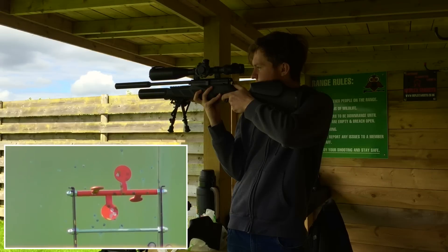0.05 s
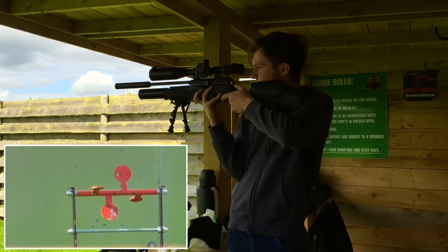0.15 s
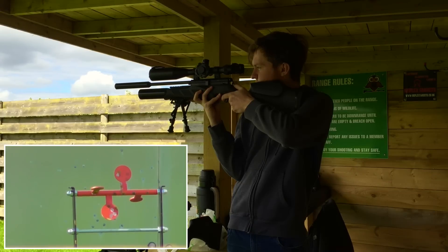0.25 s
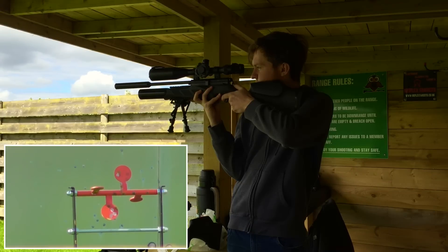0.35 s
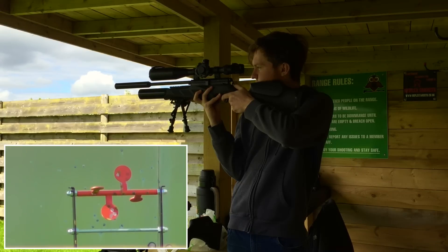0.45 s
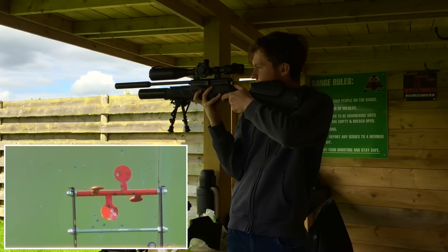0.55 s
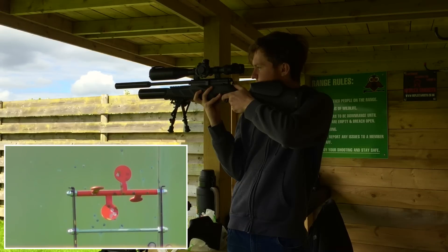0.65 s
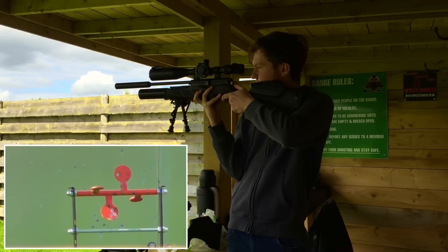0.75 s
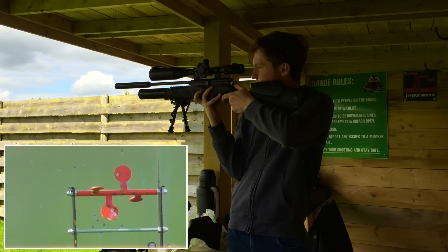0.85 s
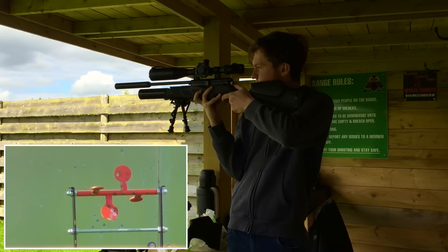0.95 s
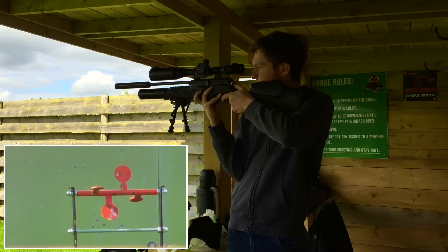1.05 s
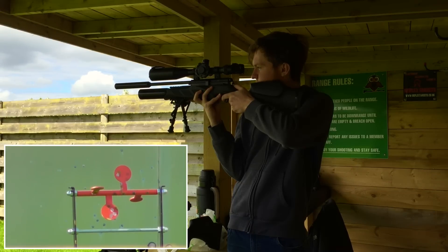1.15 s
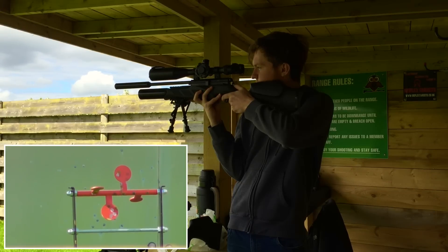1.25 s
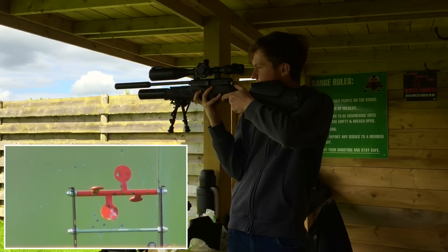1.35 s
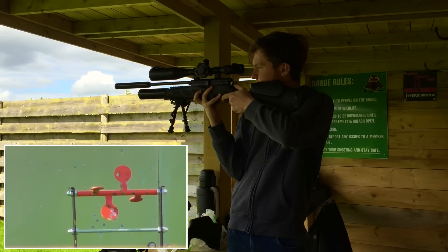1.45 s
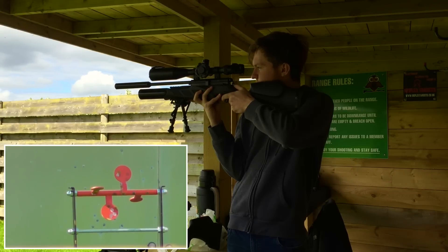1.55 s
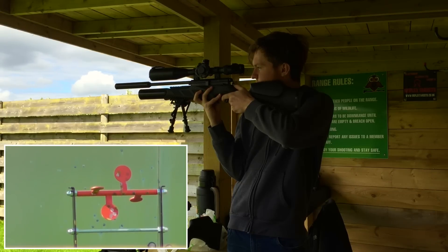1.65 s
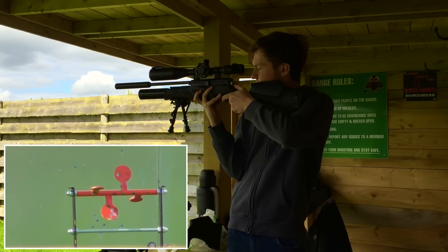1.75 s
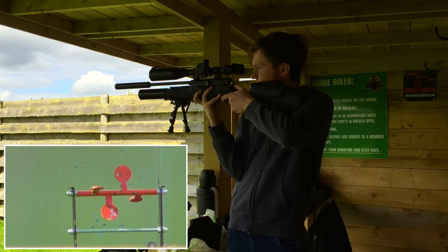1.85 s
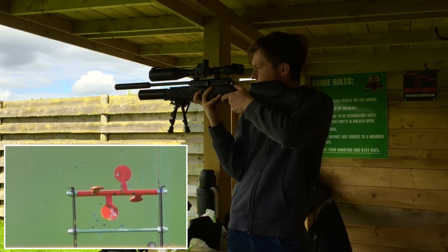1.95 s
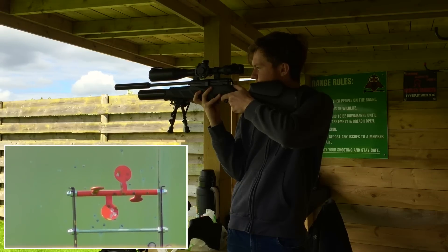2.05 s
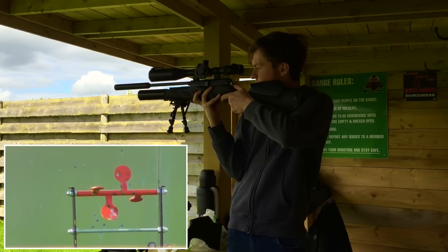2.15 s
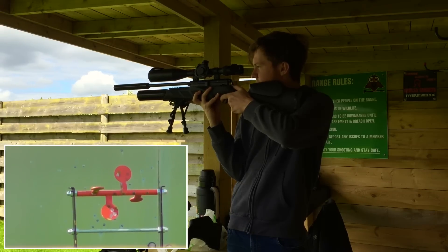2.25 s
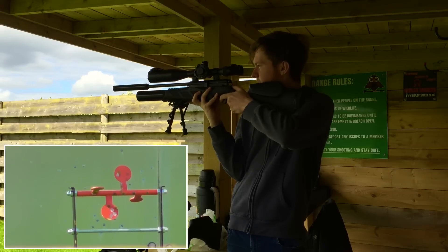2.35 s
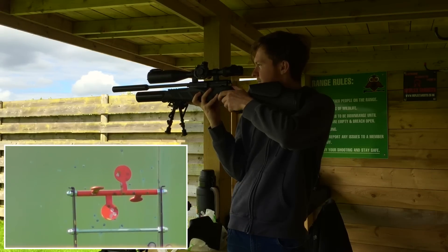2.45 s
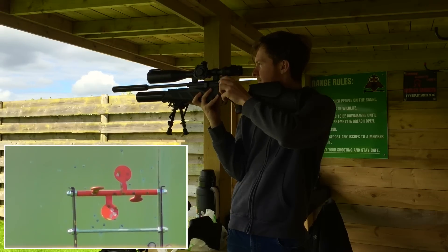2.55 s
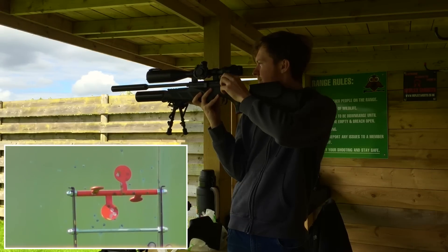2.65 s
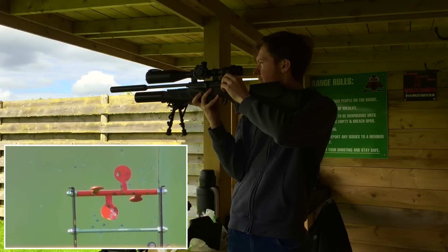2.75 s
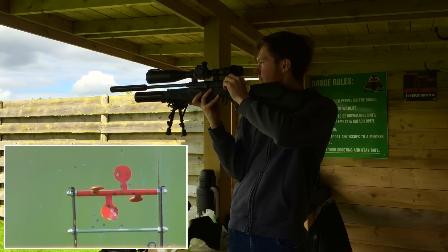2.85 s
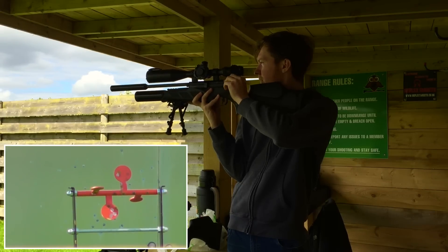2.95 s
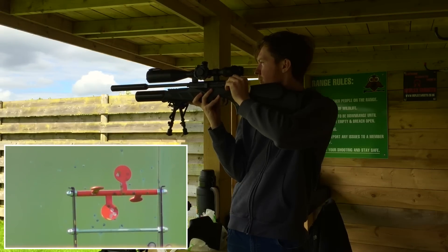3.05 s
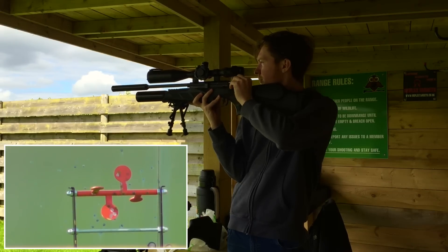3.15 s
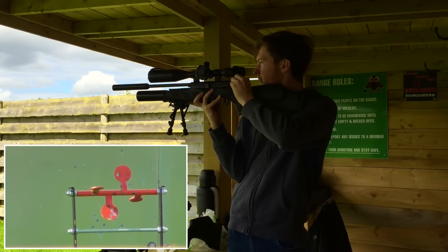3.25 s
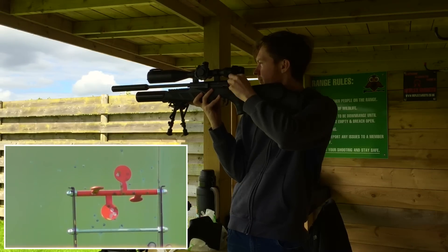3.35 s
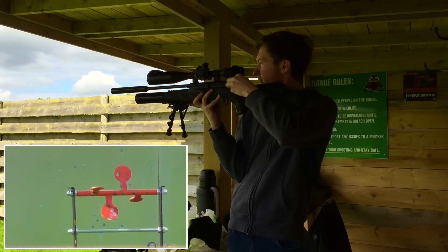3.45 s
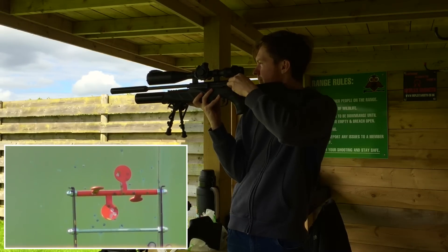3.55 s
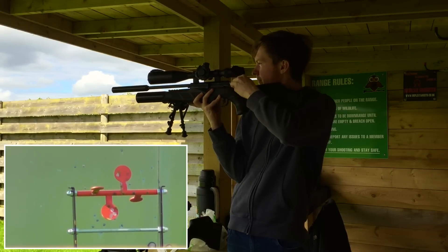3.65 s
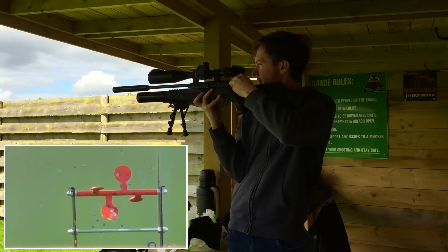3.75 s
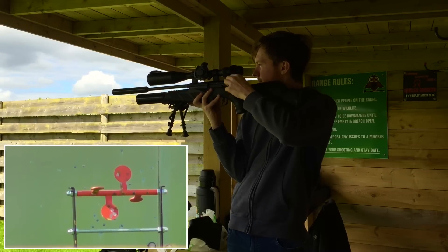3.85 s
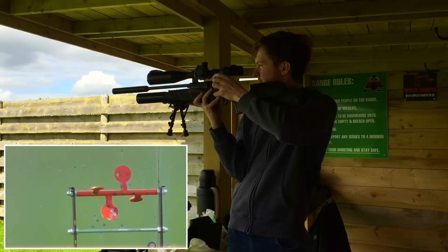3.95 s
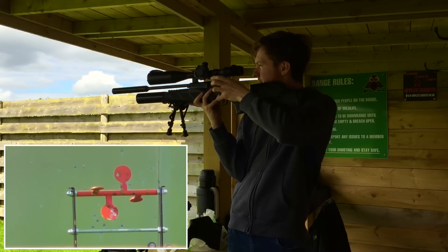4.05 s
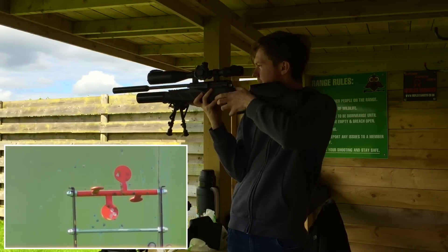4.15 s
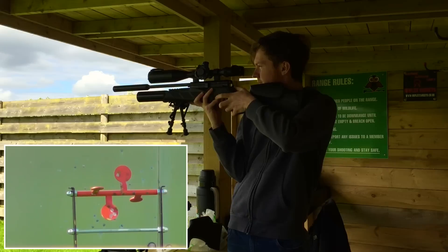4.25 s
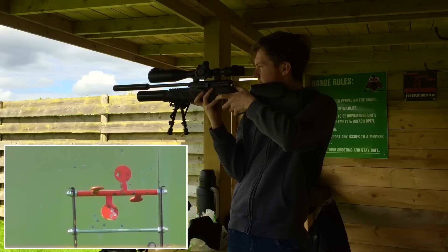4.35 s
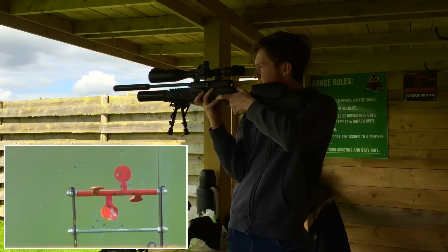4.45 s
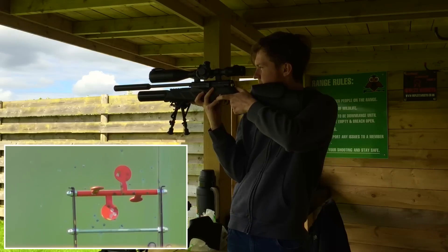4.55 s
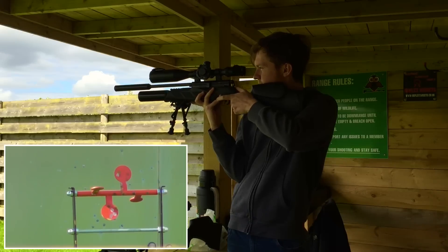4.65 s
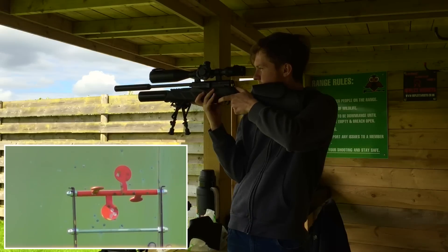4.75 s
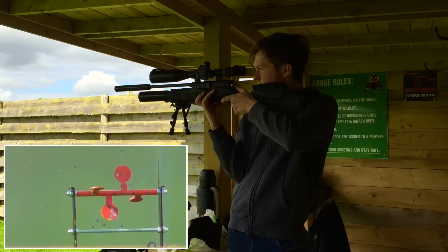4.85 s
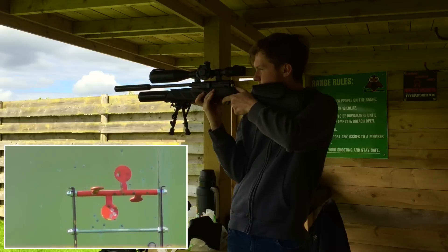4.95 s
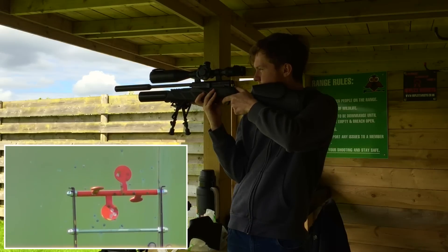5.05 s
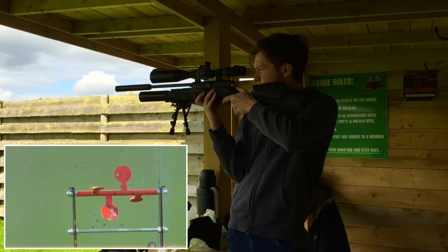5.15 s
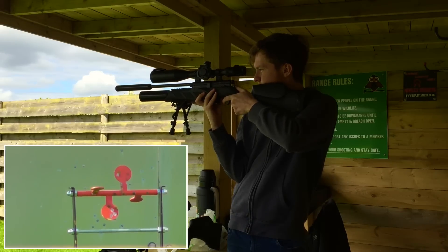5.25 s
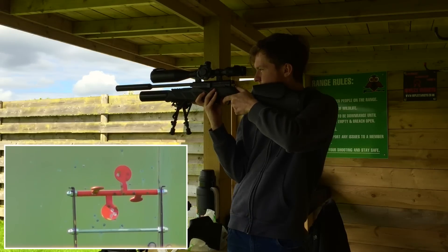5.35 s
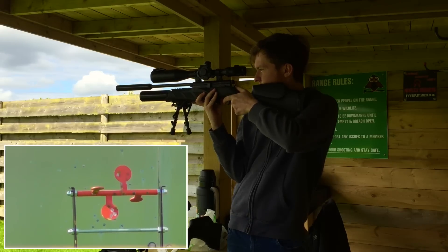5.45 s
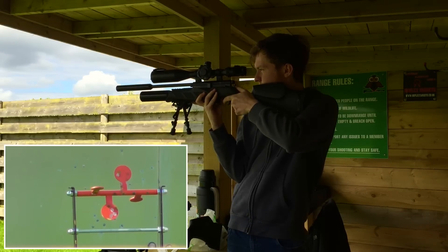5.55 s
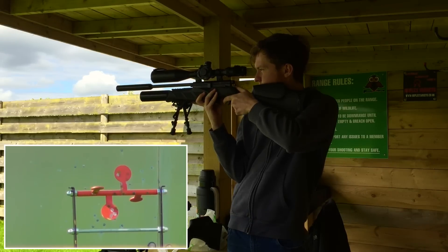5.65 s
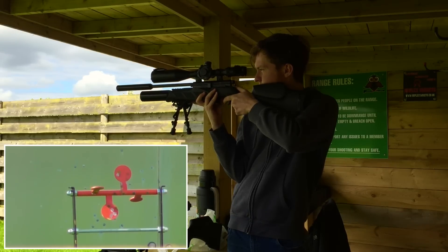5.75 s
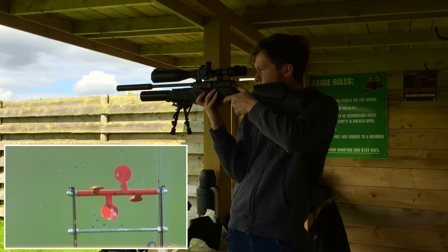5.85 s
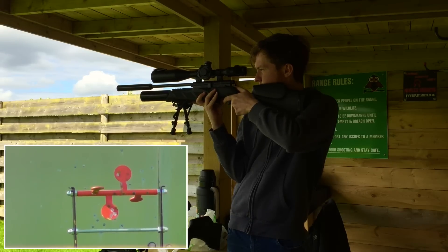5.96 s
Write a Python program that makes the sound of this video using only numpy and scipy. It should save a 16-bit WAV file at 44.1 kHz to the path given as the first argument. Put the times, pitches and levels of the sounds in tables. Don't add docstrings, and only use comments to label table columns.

```python
import sys
import numpy as np
from scipy import signal
from scipy.fft import rfft, irfft
from scipy.io import wavfile
from scipy.ndimage import uniform_filter1d

SR = 44100
rng = np.random.default_rng(int(sys.argv[2]) if len(sys.argv) > 2 else 0)


def digitize_waveform(pressure):
    field = np.atleast_2d(pressure).T
    bounded = np.clip(field, -1, 1)
    quanta = np.round(bounded * 32767).astype(np.int16)
    wavfile.write(sys.argv[1], SR, quanta)


def volts(x):
    e = np.asarray(x, float) / 20
    return 10 ** e


N = 265305

# (time [s], ring level [dB], crack level [dB])
STRIKES = [
    (2.0545, -22.5, -14),
    (2.1038, -67, -23),
    (2.463, -67, -56),
]
# (frequency [Hz], level [dB], t60 [s])
STOCK_MODES = [(320, -22.5, 0.035), (593, -0.5, 0.01), (716, 2.5, 0.057), (1020, -44, 0.024),
               (1269, 11, 0.032), (1466, 21.5, 0.0085), (1977, 4.5, 0.04)]
# (frequency [Hz], level [dB], t60 [s])
BREECH_MODES = [(2270, 1, 0.009), (2314, 2, 0.01), (3005, 8, 0.0086), (3023, 4, 0.014), (3850, 3.5, 0.0065),
                (4430, 2.5, 0.0048)]
# (frequency [Hz], level [dB], t60 [s])
BOLT_MODES = [(5290, 3, 0.005), (5560, 1, 0.035), (5720, 17, 0.009), (6255, 14, 0.003), (7390, 7, 0.0047),
              (8320, 10, .005)]


def rms_one(x):
    return x / np.sqrt(np.mean(x ** 2) + 1e-20)


def along(rows):
    s, db = np.transpose(rows)
    return volts(np.interp(np.arange(N) / SR, s, db, left=-200, right=-200))


def swelling(start, rise, hold, fall, level_db):
    corners = np.cumsum([start, rise, hold, fall])
    return along(np.transpose([corners, level_db - np.array([30, 0, 0, 30])]))


def bumps(rows, width_s):
    t = np.arange(0, N, 40) / SR
    swings = sum(db * np.exp(-((t - s) / width_s) ** 2) for s, db in rows)
    return np.interp(np.arange(N) / SR, t, swings)


def at_hz(points, hz):
    table = np.array(points)
    return np.interp(np.log(hz), np.log(table[:, 0]), table[:, 1])


def coloured(x, spectrum):
    gain = volts(np.maximum(at_hz(spectrum, np.linspace(1, SR / 2, 4097)), -90))
    cepstrum = irfft(np.log(gain))
    cepstrum[1:4096] *= 2
    cepstrum[4097:] = 0
    response = irfft(np.exp(rfft(cepstrum)))
    response = response / np.sqrt(np.sum(response ** 2))
    return signal.fftconvolve(x, response)[:len(x)]


def drift(rate_hz):
    r = np.exp(-80 * np.pi * rate_hz / SR)
    noise = rng.standard_normal(N // 40 + 2002)
    slow = signal.lfilter([1], [1, -2 * r, r * r], noise)[2000:]
    return np.interp(np.arange(N) / 40, np.arange(len(slow)), rms_one(slow))


def ring(x, hz, t60):
    r, w = volts(-60 / (t60 * SR)), 2 * np.pi * hz / SR
    return signal.lfilter([0, np.sin(w)], [1, -2 * r * np.cos(w), r * r], x + 1e-18)


def filtered(x, order, hz, kind):
    return signal.sosfilt(signal.butter(order, hz, kind, fs=SR, output="sos"), x)


def dying(decays, rise_s):
    t = np.arange(SR) / SR
    edges = 40 * 2 ** np.arange(0, 9, 1 / 3)
    white = rng.standard_normal((2, SR))
    out = 0
    for k, (low, high) in enumerate(zip(edges, edges[1:])):
        band = filtered(white[k % 2], 2, [low, high], "band")
        t60 = at_hz(decays, np.sqrt(low * high))
        out = out + band * volts(-60 * t / t60)
    return out * np.minimum(t / rise_s, 1)


def add(out, s, x):
    i = round(s * SR)
    out[i:i + len(x)] += x[:N - i]


def rifle_shot():
    # (time [s], peak level [dB], air level [dB], air t60 [s])
    pulses = [
        (1.749, -78.5, -64, 0.081),
        (1.7642, -69, -51, 0.053),
        (1.7697, -17, -19, 0.04),
        (1.773, -11.5, -13, 0.035),
        (1.7831, -17, -22, 0.056),
        (1.792, -21, -25, .055),
    ]
    # (frequency [Hz], level [dB per Hz])
    blast_tone = [(40, -13.5), (90, -2.5), (180, 1.5), (270, 0.5), (370, -11), (520, -16), (640, -3.5),
                  (850, -11.5), (1500, -5.5), (3000, -8.5), (4200, -9.5), (6200, -7.5), (8500, -10.5),
                  (16000, -15)]
    out, t = np.zeros(N), np.arange(SR // 5) / SR
    for s, peak_db, air_db, t60 in pulses:
        n_wave = (t / 0.00011 - 1) * (t < .00024)
        air = rng.standard_normal(len(t)) * volts(-60 * t / t60)
        add(out, s, volts(peak_db + 2) * n_wave + volts(air_db) * air)
    return coloured(out, blast_tone)


def field_echo():
    # (start [s], rise [s], hold [s], fall [s], level [dB])
    echoes = [
        (1.79, .07, .005, .1, -44.5),
        (1.85, .12, .07, .4, -56),
    ]
    # (frequency [Hz], level [dB per Hz])
    echo_tone = [(290, -47), (500, -24), (578, -4), (678, -11.5), (750, -11), (1980, 0.5), (3250, -8),
                 (3980, -5), (16000, -21.5)]
    level = sum(swelling(*echo) for echo in echoes)
    return level * volts(2 * drift(42)) * coloured(rng.standard_normal(N), echo_tone)


def spinner():
    plate_hz = [1202, 1106, 1410, 1744, 1967, 2040, 2117, 2145, 2270, 2406, 2592, 2770, 3028, 3429, 3459,
                3760, 3989, 4245, 4525, 4558, 5426, 5809, 6400, 6657, 6860, 7106, 7537, 7817]
    # (level [dB], t60 [s])
    plate_modes = [(-34, 0.64), (-32.5, 0.96), (-6.5, 1), (-18, .6), (5, 0.42), (5.5, 0.36), (6, 0.45),
                   (-0.5, 0.3), (-2.5, 1), (-24.5, 0.26), (12.5, 0.26), (-9, .6), (4, 0.28), (3.5, 0.64),
                   (-14, 0.94), (5, 0.33), (5, 0.59), (1.5, 0.35), (3, 0.55), (-28, 0.18), (-2, 0.48),
                   (-39, 0.18), (9.5, 0.15), (20.5, 0.035), (4, 0.2), (2, .2), (-14, 0.1), (8.5, 0.12)]
    # (frequency [Hz], level [dB per Hz])
    wash_tone = [(290, -69), (500, -31), (2070, -4.5), (2390, -7), (2540, -9), (3250, -12.5), (4150, -4.5),
                 (4870, -10.5), (6140, -8), (13400, -15), (16000, -16.5)]
    # (frequency [Hz], t60 [s])
    wash_decay = [(600, 1.45), (1600, 0.86), (2500, 0.86), (4200, 0.6), (7000, 0.54), (11000, 0.4),
                  (15000, 0.19)]
    out = np.zeros(N)
    wash = coloured(dying(wash_decay, rise_s=0.00057), wash_tone)
    wash = wash * volts(drift(70)[:SR])
    crack = filtered(np.eye(1, 200)[0], 3, [900, 14000], "band")
    for s, ring_db, crack_db in STRIKES:
        add(out, s, volts(ring_db - 4.5) * wash)
        add(out, s, -volts(crack_db + 9) * crack)
    times, ring_levels, _ = np.transpose(STRIKES)
    at = [round(s * SR) for s in times]
    for hz, (level_db, t60) in zip(plate_hz, plate_modes):
        clicks = np.zeros(N)
        clicks[at] = volts(ring_levels + level_db - 18.5) * rng.choice([-1, 1])
        out += ring(clicks, hz, t60) * volts(2 * drift(48))
    return out


def crossbar():
    # (frequency [Hz], level [dB], t60 [s])
    bar_modes = [
        (1095, -49, 1.0),
        (1109, -50, 1.0),
        (1570, -46, .9),
        (2117, -42, .6),
        (2312, -44, .8),
        (2335, -43, .95),
        (2537, -36, .92),
        (4245, -43, .5),
    ]
    click = np.zeros(N)
    click[round(STRIKES[0][0] * SR)] = 1
    return volts(2.5 * drift(9)) * sum(ring(volts(db) * click, hz, t60) for hz, db, t60 in bar_modes)


def fragment():
    # (start [s], rise [s], hold [s], fall [s], level [dB])
    whine = (2.073, .01, .032, .05, -37.5)
    start_hz, end_hz, sag_s = 14800, 10900, .02
    since = np.maximum(np.arange(N) / SR - whine[0], 0)
    pitch_hz = end_hz + (start_hz - end_hz) * np.exp(-since / sag_s)
    angle = 2 * np.pi * np.cumsum(pitch_hz) / SR
    rough = filtered(rng.standard_normal((2, N)), 2, 450, "low")
    return swelling(*whine) * rms_one(rough[0] * np.cos(angle) + rough[1] * np.sin(angle))


def clinks():
    # (time [s], peak level [dB], frequency [Hz], t60 [s], overtone level [dB])
    touches = [
        (2.462, -49, 4120, .04, -22),
        (2.579, -60, 2970, 0.14, -32),
        (2.697, -40, 4110, 0.08, -14.5),
        (2.7551, -57.5, 4190, 0.083, -20),
        (2.8923, -50.5, 3936, 0.032, -26),
        (3.21, -69.5, 6030, 0.055, -34),
        (3.2254, -52, 6130, 0.042, -31),
    ]
    out, t = np.zeros(N), np.arange(SR // 3) / SR
    click = np.eye(1, len(t))[0]
    for s, peak_db, hz, t60, over_db in touches:
        group = ring(click, hz, t60) + .6 * ring(click, 1.02 * hz, t60) + 1.2 * ring(click, .95 * hz, .25 * t60)
        beside = .5 * ring(click, 1.11 * hz, .25 * t60) + .25 * ring(click, .77 * hz, .25 * t60)
        over = ring(click, 2.29 * hz, .5 * t60) + .7 * ring(click, 2.13 * hz, .25 * t60)
        clink = (group + beside + volts(over_db) * over) * np.minimum(t / .001, 1)
        add(out, s - .0007, volts(peak_db - 6) * clink)
    return out


def body(x, modes):
    rings = 0
    for k, (hz, db, t60) in enumerate(modes):
        rings = rings + (-1) ** k * volts(db + rng.normal(0, 1.5)) * ring(x, hz, t60)
    broad = filtered(x, 2, [max(.8 * modes[0][0], 800), 1.15 * modes[-1][0]], "band")
    both = rings / np.max(np.abs(rings)) + 1.05 * broad / np.max(np.abs(broad))
    return both / np.max(np.abs(both))


def bolt_action():
    # (time [s], peak level [dB], stock level [dB], bolt level [dB])
    contacts = [(3.259, -26.5, -9.5, -17), (3.265, -34.5, -18, -16), (3.277, -56, -20, -19.5),
                (3.684, -68, 6, -28), (3.709, -32.5, -15, -15), (3.712, -31.5, -34, -5.5),
                (3.723, -12, -25, -7.5), (3.732, -29.5, -2, 0), (3.746, -35, -26.5, -11),
                (3.88, -34.5, -13, -19), (3.894, -34.5, -14, -21.5), (3.967, -42, -30, -4),
                (3.978, -49, -35, -6), (4.003, -34.5, -39, -4), (4.018, -32.5, -11, -16),
                (4.044, -20, -11, -3), (4.177, -21, -7, -12.5), (4.188, -49.5, 0, -28),
                (4.211, -40.5, -4, -16)]
    contact_s, breech_db, tick_db = .003, -10.5, -4
    out, t = np.zeros(N), np.arange(SR // 5) / SR
    x = t / contact_s
    for s, peak_db, stock_db, bolt_db in contacts:
        impacts = rng.standard_normal(len(t)) * x * (np.exp(-2.2 * x) + 0.0094 * np.exp(-.25 * x))
        tick = filtered(impacts, 2, [7000, 15500], "band")
        parts = volts(stock_db) * body(impacts, STOCK_MODES)
        parts += volts(breech_db) * body(impacts, BREECH_MODES)
        parts += volts(bolt_db) * body(impacts, BOLT_MODES)
        parts += volts(bolt_db + tick_db) * tick / np.max(np.abs(tick))
        add(out, s - .0006, volts(peak_db + 5) * parts)
    return filtered(out, 2, 300, "high")


def bolt_slide():
    # (start [s], stop [s], start level [dB], stop level [dB])
    strokes = [
        (3.66, 3.724, -92, -61),
        (3.88, 3.96, -67, -79),
        (3.965, 4.045, -69, -61),
        (4.1, 4.178, -72, -68),
    ]
    grit = rng.standard_normal(N) * volts(2.5 * drift(90))
    steel = rms_one(body(grit, STOCK_MODES + BREECH_MODES + BOLT_MODES))
    hiss = rms_one(filtered(grit, 1, [1000, 9000], "band"))
    level = sum(along([(start, start_db), (stop, stop_db)]) for start, stop, start_db, stop_db in strokes)
    return level * (1.14 * steel + hiss)


def hand():
    # (start [s], rise [s], hold [s], fall [s], level [dB])
    rub_swell = (3.045, .035, .045, .08, -57.5)
    rub = rng.standard_normal(N) * volts(3 * drift(50))
    hollow = rms_one(ring(ring(rub, 550, .025), 570, .015))
    shuffle = rms_one(ring(ring(rub, 200, .02), 260, .02))
    return swelling(*rub_swell) * (hollow + volts(1.5) * shuffle)


def wind():
    # (frequency [Hz], level [dB per Hz])
    rumble_tone = [(12, -46.5), (20, -17.5), (46, 3), (75, 4.5), (160, -11), (193, -13.5), (211, -22.5),
                   (239, -22), (400, -39), (520, -62), (880, -120)]
    # (time [s], rise over the breeze [dB])
    gusts = [(.04, 6), (.21, 8), (.25, 10), (.48, 6.5), (.525, 4), (.65, 8.5), (.945, 3.5), (1.125, 10.5),
             (1.27, 4.5), (1.405, 1.5), (1.79, 11.5), (2.077, 4), (2.41, 12), (2.558, 3), (2.973, 12),
             (3.147, 9), (3.574, 9.5), (3.698, 2.5), (3.755, 13.5), (4.215, 0.5), (4.575, 7.5),
             (4.626, 8.5), (4.882, 10.5), (4.982, 8.5), (5.052, 3), (5.256, 8), (5.433, 2.5), (5.678, 11)]
    # (time [s], drop under the breeze [dB])
    lulls = [(.13, 5), (.31, 9.5), (.77, 15), (1.52, 8.5), (2.17, 7), (3.83, 8), (4.16, 3), (4.33, 10),
             (4.935, 6.5), (5.725, 15)]
    # (time [s], peak level [dB], frequency [Hz], length [s])
    slaps = [
        (3.641, -26, 88, .034),
        (3.636, -36, 230, .009),
        (1.795, -40, 100, .06),
    ]
    breeze_db, gust_s, lull_s = -53.5, .024, .051
    lumps = coloured(rng.standard_normal(N) * volts(6.3 * drift(45)), rumble_tone)
    lumps = filtered(lumps, 2, 32, "high")
    evened = lumps / (uniform_filter1d(lumps ** 2, size=2600) + 1e-6) ** .33
    out = volts(breeze_db + bumps(gusts, gust_s) - bumps(lulls, lull_s)) * rms_one(evened)
    for s, peak_db, hz, length in slaps:
        t = np.arange(N) / SR - s
        swell = np.exp(-(2 * t / length) ** 2)
        glide = 1 - 8 * np.clip(t, -.05, .05)
        slap = volts(peak_db) * swell * np.sin(2 * np.pi * hz * t * glide)
        out = out * (1 - .9 * np.sqrt(swell)) - slap
    return out


def road():
    # (frequency [Hz], level [dB per Hz])
    tyre_tone = [(88, -24), (150, -14), (193, -7), (240, -8.5), (259, -11), (431, -20.5), (589, -19.5),
                 (730, -13.5), (941, -14.5), (1100, -18.5), (1980, -27), (9260, -41.5), (10400, -43.5),
                 (14200, -44), (16000, -59.5)]
    road_db, whine_db, engine_db = -71.6, -10.5, -68.5
    engine_hz, engine_width_hz = 191.2, 7.8
    tyres = coloured(rng.standard_normal(N), tyre_tone + [(20000, -93.5)]) * volts(6 + .8 * drift(3))
    whine = 0
    for hz in (700, 850, 980, 1120):
        whine = whine + volts(4 * drift(2)) * rms_one(ring(rng.standard_normal(N), hz, .03))
    engine = rms_one(ring(rng.standard_normal(N), engine_hz, 4 / engine_width_hz))
    return volts(road_db) * (tyres + volts(whine_db) * whine) + volts(engine_db + 1.1 * drift(.7)) * engine


def second_engine():
    level = swelling(start=4.1, rise=.4, hold=1.6, fall=.5, level_db=-68)
    return level * rms_one(ring(rng.standard_normal(N), hz=236, t60=1.0))


def reflected(x, tail, wet_db):
    return x + volts(wet_db) * signal.fftconvolve(x, tail)[:N]


def scene():
    # (frequency [Hz], t60 [s])
    shelter_decay = [(80, 0.15), (300, 0.24), (800, 0.21), (2000, 0.12), (5000, 0.15), (13000, 0.099)]
    # (frequency [Hz], t60 [s])
    yard_decay = [(300, .3), (2000, .3), (6000, 0.26), (14000, .25)]
    tail = dying(shelter_decay, rise_s=.005) * volts(2 * drift(250)[:SR])
    near = reflected(rifle_shot(), tail, wet_db=-22)
    near = near + reflected(bolt_action() + bolt_slide() + hand(), tail, wet_db=-32)
    far = field_echo() + spinner() + crossbar() + fragment() + reflected(clinks(), tail, wet_db=-34.5)
    background = wind() + road() + second_engine()
    near = reflected(near, dying(yard_decay, rise_s=.02), wet_db=-45.5)
    return (near + far + background)[None]


def top_cut(x):
    return signal.sosfilt(signal.butter(12, 16820, fs=SR, output="sos"), x)


def record(dry):
    rounded = .65 * np.tanh(dry / .65)
    low_pass = signal.cheby2(10, 50, 16600, fs=SR, output="sos")
    return top_cut(signal.sosfilt(low_pass, rounded))


dry = scene()
out = record(dry)
digitize_waveform(out)
```